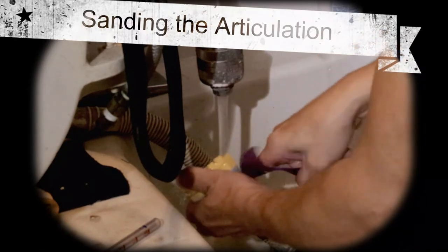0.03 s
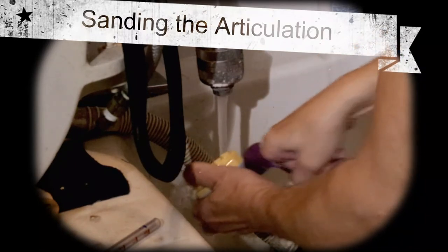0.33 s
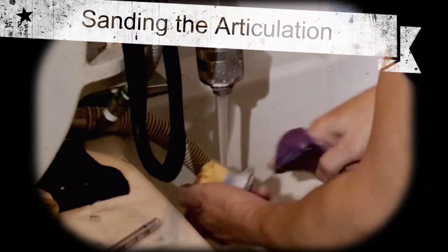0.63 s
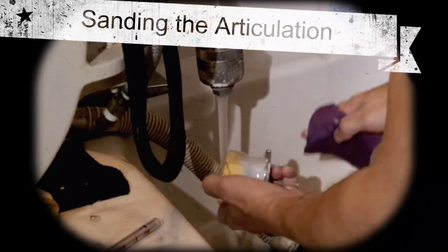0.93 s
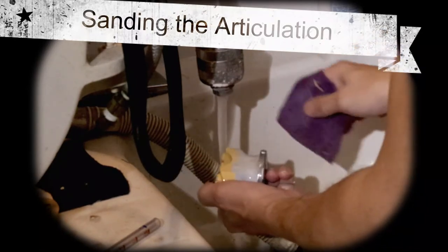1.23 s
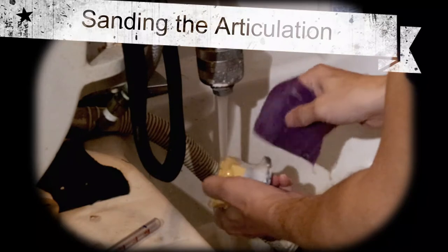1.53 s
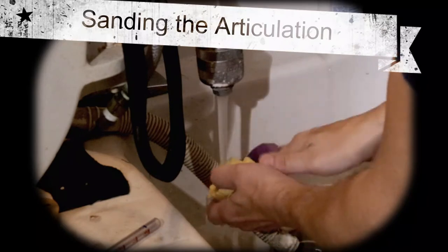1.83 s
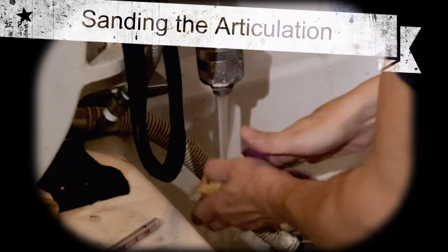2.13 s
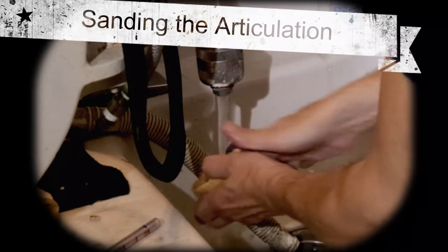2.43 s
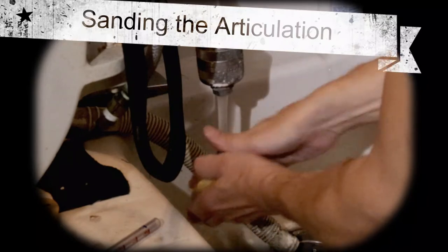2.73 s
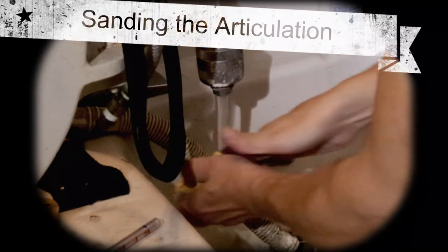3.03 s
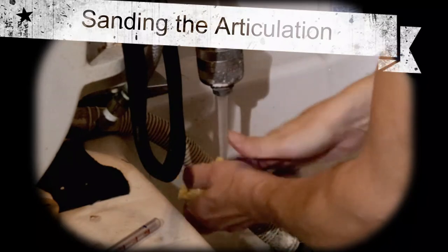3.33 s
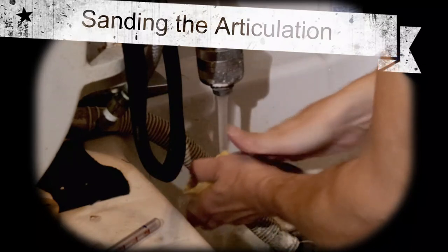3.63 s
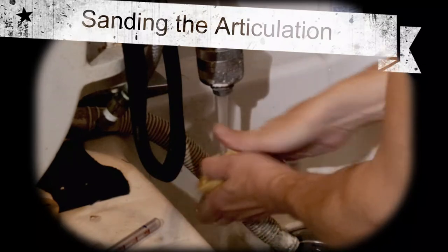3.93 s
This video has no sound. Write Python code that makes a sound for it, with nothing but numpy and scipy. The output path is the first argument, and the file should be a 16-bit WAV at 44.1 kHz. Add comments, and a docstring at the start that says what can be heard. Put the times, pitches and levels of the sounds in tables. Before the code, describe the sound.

Wet sandpaper rubs on a small hard piece in quick, hissing strokes, about eight a second. At around 0.6 seconds it stops, leaving faint paper crackles. At 1.8 seconds the paper lands with a wet slap, and the sanding continues until 4 seconds with small sharp catches. Throughout, tap water patters and bubbles softly in a tub, with a faint wavering hollow tone.

```python
"""Wet sanding under a running tap

Wet sandpaper is rubbed to and fro on a small hard piece in a tub, eight strokes a second.
The hand stops, shifts its grip on the paper, slaps it back on and sands on. Tiny hits of grit
make the hiss and ring the piece. Water patters and bubbles, and a hollow note wavers throughout.
Weak copies just before and after the sound make the whole mono scene hollow."""
import sys
import numpy as np
from scipy import signal
from scipy.fft import rfft, irfft, next_fast_len
from scipy.io import wavfile
from scipy.ndimage import map_coordinates

SR = 44100
rng = np.random.default_rng(int(sys.argv[2]) if len(sys.argv) > 2 else 0)


def wrap_up_sound(samples):
    """Save the sound to the file named by the first command line argument, as 16-bit audio."""
    columns = np.atleast_2d(samples).T
    # keep every value between -1 and 1, then stretch to whole-number steps
    tamed = np.clip(columns, -1, 1)
    steps = np.round(tamed * 32767).astype(np.int16)
    wavfile.write(sys.argv[1], SR, steps)


N = 176400


def amp(db):
    """Turn decibels into a gain to multiply by."""
    return 10 ** (np.asarray(db) / 20)


def unit(x):
    """Scale a signal to an average power of 1."""
    return x / np.sqrt(np.mean(x ** 2) + 1e-20)


def unit_spectra(gain):
    """Scale each spectrum (column) to an average power of 1."""
    return gain / np.sqrt(np.mean(gain ** 2, axis=0) + 1e-20)


def db_at(points, hz):
    """Read the level at hz from (frequency, level) points, on a log frequency axis."""
    point_hz, point_db = np.transpose(points)
    return np.interp(np.log(hz + 1), np.log(point_hz + 1), point_db)


def curve(points):
    """Join (time, value) points with straight lines, one value per sample."""
    return np.interp(np.arange(N) / SR, *np.transpose(points))


def wobble(per_s):
    """A smooth curve through per_s random values a second."""
    return map_coordinates(rng.standard_normal(4096), [np.arange(N) * per_s / SR], order=2, mode="wrap")


def bell(x, width):
    """A smooth hump of height 1 around zero."""
    return np.exp(-.5 * np.minimum((x / width) ** 2 / 2, 100))


def filtered(x, response):
    """Filter x by a gain that depends on frequency."""
    size = next_fast_len(N + SR // 4)
    return irfft(rfft(x, size) * response(np.fft.rfftfreq(size, 1 / SR)), size)[:N]


def moving_filter(x, power):
    """Filter x by a power that depends on frequency and time."""
    hz, t, spectra = signal.stft(x, SR, nperseg=256)
    return signal.istft(spectra * np.sqrt(power(hz[:, None] + 1, t)), SR, nperseg=256)[1][:N]


def noise(spectrum):
    """Steady noise shaped by (frequency, level) points."""
    return unit(filtered(rng.standard_normal(N), lambda hz: amp(db_at(spectrum, hz))))


def ringing(peaks, hz):
    """A filter response that is flat except for a lift or dip at each resonance."""
    return 1 + sum((amp(db) - 1) * 1j * hz * width / (centre ** 2 - hz ** 2 + 1j * hz * width)
                   for centre, width, db in peaks)


def impacts(per_s, spread_db, chatter_db):
    """Tiny hits of random size; chatter bunches them, as sticking and slipping does."""
    hits = (rng.random(N) < per_s / SR) * rng.choice([-1, 1], N)
    size_db = spread_db * np.minimum(rng.exponential(size=N), 5)
    return unit(hits * amp(size_db + chatter_db * wobble(per_s=420)))


def patchy(x, depth_db):
    """Add narrow resonances that come and go as water and contact shift."""
    patch_hz, patches_per_s = 119.87, 28
    spectra = signal.stft(x, SR, nperseg=768)[2]
    rows = np.linspace(0, SR / 2 / patch_hz, len(spectra))
    columns = np.linspace(0, N / SR * patches_per_s, spectra.shape[1])
    grid = np.meshgrid(rows, columns, indexing="ij")
    patches = unit(map_coordinates(rng.standard_normal((400, 400)), grid, order=1, mode="wrap"))
    return unit(signal.istft(spectra * amp(depth_db * patches), SR, nperseg=768)[1][:N])


def rumble():
    """A faint, low noise under the water."""
    # tone of the rumble (frequency [Hz], relative level [dB])
    spectrum = [(25, -22), (55, -19), (120, -5), (200, -1.5), (330, 3.5), (600, 1), (1500, -19)]
    return amp(-66) * noise(spectrum)


def hollow_note():
    """A quiet tone that wavers in pitch and flutters in level."""
    # how the note swells and fades (time [s], relative level [dB])
    swells = [(0, -63), (.42, -65), (.5, -57.5), (.65, -54), (.72, -62), (1.0, -59), (1.35, -53),
              (1.55, -52), (1.62, -63), (1.75, -58), (2.05, -56), (2.15, -67), (2.45, -64), (2.9, -57.5),
              (3.2, -58.5), (3.6, -64.5), (3.75, -51), (4, -61)]
    pitch_hz = 460.6 + 6 * wobble(per_s=70)
    flutter_db = 3.9 * wobble(per_s=45)
    tone = np.sin(2 * np.pi * np.cumsum(pitch_hz) / SR)
    return amp(curve(swells) - 2.5) * unit(tone * amp(flutter_db))


def bubbles():
    """Small bubbles ring where the stream lands, each rising in pitch as it dies away."""
    per_s, typical_hz, pitch_spread, decay_cycles = 700, 1734, 0.2933, 10.6
    when, size, a, b = rng.random((int(per_s * N / SR), 4)).T[:, :, None]
    scatter = np.sqrt(-2 * np.log(1 - a)) * np.cos(2 * np.pi * b)  # bell-curve random numbers
    hz = typical_hz * np.exp(pitch_spread * scatter)
    size_db = np.minimum(-np.log(1 - size), 4)
    samples = np.arange(SR // 50)
    cycles = hz * samples / SR
    age = cycles / decay_cycles
    rings = amp(size_db) * np.exp(-age) * np.sin(2 * np.pi * cycles * (1 + 0.046 * age))
    positions = (when * N).astype(int) + samples
    return unit(np.bincount(positions.ravel(), rings.ravel(), N)[:N])


def running_tap():
    """The jet hisses while its drops patter and bubbles ring."""
    # tone of the falling water (frequency [Hz], relative level [dB])
    spectrum = [(30, -28), (200, -18.5), (400, -8.5), (650, -6), (850, -1.5), (1200, -2), (1700, 1.5),
                (2200, 4), (2600, -4), (3300, -3.5), (4400, -0.5), (5500, -4), (7500, -7), (8800, -3),
                (11300, -4), (12200, -10.5), (15500, -20.5)]
    # hissing bands of the jet (frequency [Hz], width [Hz], lift [dB])
    jet_bands = [(4140, 340, 0), (6450, 77, 14), (6770, 110, 14), (10020, 120, 6), (11290, 145, 5)]
    # how the water swells and fades (time [s], level [dB])
    swells = [(0, -47), (.6, -41), (.8, -40), (1.3, -38.5), (1.7, -40), (1.9, -41.5), (2.1, -43.5),
              (2.6, -47.5), (2.85, -40.5), (4, -37.5)]
    drops = patchy(impacts(per_s=12000, spread_db=2.5, chatter_db=0.3), depth_db=3.5)
    spray = unit(filtered(drops, lambda hz: amp(db_at(spectrum, hz)) * ringing(jet_bands, hz)))
    level_db = curve(swells) + 0.76 * wobble(per_s=18)
    return amp(level_db) * (spray + amp(-10) * bubbles())


def scuff(at_s, envelope, centre_hz, octaves, grains):
    """One short scrape: a band of grains whose level follows envelope(time since at_s)."""
    out, half = np.zeros(N + SR), SR // 8
    middle = round(at_s * SR)
    offsets = np.arange(-half, half)
    hz = np.fft.rfftfreq(2 * half, 1 / SR) + 1
    nearby = np.take(grains, middle + offsets, mode="wrap")
    band = unit(irfft(rfft(nearby) * bell(np.log2(hz / centre_hz), octaves)))
    out[middle - half:middle + half] = band * envelope(offsets / SR)
    return out[:N]


def paper_handling():
    """The paper catches sharply as the hand moves it, and crackles in the pause."""
    # the paper catches and judders (time [s], decay [s], relative level [dB], pitch [Hz])
    catches = [(.718, 0.01, -21, 4600), (.720, .011, -26.5, 6960), (1.897, 0.019, -29, 1800),
               (2.041, 0.0097, -16, 5130), (2.104, 0.024, -23.5, 2660), (2.164, 0.037, -27, 2300),
               (2.342, .02, -16, 3400), (2.413, .015, -27, 2450), (2.594, 0.0072, -14.5, 3660),
               (2.883, 0.017, -22, 1920), (3.128, 0.02, -17, 1850), (3.15, 0.0097, -25, 4870),
               (3.161, 0.01, -23, 1750), (3.273, 0.015, -22, 2540), (3.278, .012, -29.5, 1270),
               (3.331, .014, -15.5, 4500), (3.393, 0.01, -18.5, 1860), (3.653, 0.013, -14.5, 1880),
               (3.897, 0.011, -24, 1920)]
    # wet paper rustles (time [s], width [s], relative level [dB], pitch [Hz], band width [octaves])
    rustles = [(0.541, 0.01, -28, 4000, 0.22), (0.68, .010, -33, 10000, 0.21),
               (0.699, 0.013, -35, 4500, 0.52), (0.736, 0.014, -35, 7400, 0.4),
               (0.763, 0.017, -40.5, 1560, 0.68), (1.033, 0.01, -35, 5200, 0.3),
               (1.055, .003, -33.5, 4230, 0.068), (1.208, 0.0069, -35, 9000, 0.36),
               (1.228, 0.0094, -32.5, 3550, 0.19), (1.34, 0.018, -43.5, 6150, 0.088),
               (1.443, 0.021, -37, 8600, 0.066), (1.484, .004, -31, 7750, 0.39),
               (1.759, 0.0082, -32, 1940, 0.53), (1.776, 0.0017, -21, 2300, 0.35)]
    catch_rise_s, catch_octaves = .0015, 0.12
    slips = impacts(per_s=5000, spread_db=1.5, chatter_db=4)
    crackle = patchy(impacts(per_s=1800, spread_db=0.5, chatter_db=1.5), depth_db=1.5)

    def snag(t, decay_s):
        age = np.maximum(t, 0)
        return (1 - np.exp(-age / catch_rise_s)) * np.exp(-age / decay_s)
    catching = sum(amp(db) * scuff(at_s, lambda t: snag(t, decay_s), hz, catch_octaves, slips)
                   for at_s, decay_s, db, hz in catches)
    rustling = sum(amp(db) * scuff(at_s, lambda t: bell(t, width_s), hz, octaves, crackle)
                   for at_s, width_s, db, hz, octaves in rustles)
    return catching + rustling


def slap():
    """The wet paper lands on the piece and water splashes after it."""
    # tone of the slap and splash (frequency [Hz], relative level [dB])
    spectrum = [(200, -55), (450, -33), (620, -26.5), (800, -13.5), (1150, -7.5), (1500, -5), (2100, -0.5),
                (2800, -12.5), (3700, -1.5), (5200, -8.5), (6700, -23), (8500, -17.5), (11000, -33),
                (15000, -54)]
    lands_s, rise_s, smack_decay_s, splash_decay_s = 1.7935, 0.007, 0.0073, 0.076
    t = np.arange(N) / SR - lands_s
    rise, age = np.exp(np.minimum(t, 0) / rise_s), np.maximum(t, 0)
    smack = amp(-9) * np.exp(-age / smack_decay_s)
    splash = amp(-27.5) * np.exp(-age / splash_decay_s)
    return rise * (smack + splash) * noise(spectrum)


def sanding():
    """Each stroke hisses with its speed, rasps where the fingers press hardest and rings the piece."""
    # strokes of the paper, with relative levels (start [s], length [s], hiss [dB],
    # brightness [dB/octave], lower edge [Hz], ring [dB], point of hardest press [0-1],
    # rasp [dB], rasp pitch [Hz])
    strokes = [ (-.035, 0.12, -26.5, 2, 2600, -28, 0.6, -22.5, 3740),
               (0.089, 0.11, -25.5, 7.5, 2600, -28, 0.3, -22.5, 3900),
               (0.204, 0.12, -26, -0.5, 2680, -30.5, 0.68, -19.5, 3980),
               (0.331, 0.11, -24, 3, 2600, -28, 0.75, -24, 3370),
               (0.442, 0.11, -25, 3, 2660, -35.5, 0.25, -23.5, 3200),
               (1.902, 0.11, -21.5, -1, 3900, -43, .35, -27, 5100),
               (2.027, 0.11, -19, -2, 3580, -46, 0.3, -32, 4900),
               (2.166, 0.092, -20.5, 4.5, 3700, -42, 0.16, -23.5, 4170),
               (2.283, 0.089, -22, -1.5, 3650, -60, 0.86, -22.5, 3240),
               (2.413, 0.099, -26, -1, 3560, -44, 0.14, -28, 4070),
               (2.53, 0.092, -22, -5, 4260, -40.5, 0.72, -19.5, 4070),
               (2.639, 0.11, -24, -3, 3700, -36.5, 0.19, -27, 4360),
               (2.76, 0.12, -25.5, -6.5, 3460, -30.5, 0.6, -18, 4200),
               (2.888, .097, -23, -3.5, 3570, -33, 0.3, -41, 4400),
               (3.003, 0.12, -25.5, -4, 3540, -32.5, 0.6, -17.5, 3970),
               (3.144, 0.11, -24.5, 5, 3400, -29, 0.12, -26, 4270),
               (3.265, 0.11, -25.5, -3.5, 3160, -26, 0.69, -19.5, 4750),
               (3.403, 0.1, -24.5, -1, 3240, -31, 0.4, -28, 4500),
               (3.529, 0.11, -24, -4.5, 3140, -25, 0.6, -17, 4430),
               (3.646, 0.12, -26, -4, 3430, -28.5, .55, -42, 4600),
               (3.775, 0.11, -27, -5, 3300, -26, 0.61, -19, 4870),
               (3.902, 0.12, -30, 6, 3300, -29.5, 0.16, -33.5, 4500)]
    # tone of the rubbing grit (frequency [Hz], relative level [dB])
    hiss_spectrum = [(1000, 8), (3000, -5.5), (5500, 3), (7000, 0.5), (9000, -1), (10500, -14),
                     (13000, -23.5), (16000, -34)]
    # tone of the ringing piece (frequency [Hz], relative level [dB])
    piece_spectrum = [(300, -49), (600, -24), (1000, -13), (1400, -16.5), (1850, 1.5), (2200, -0.5),
                      (2700, -2.5), (4000, -4.5), (9000, -41)]
    edge_db_per_octave, dulling_db_per_octave = 32, 15.5
    press_s, rasp_octaves, glide_octaves_per_s = 0.012, 0.25, -11  # the rasp sinks as fingers close in
    skew = 0.89  # below 1 the hand speeds up faster than it slows

    def power(hz, t):
        total = np.zeros((len(hz), len(t)))
        piece = unit_spectra(amp(db_at(piece_spectrum, hz)))
        for start, length, hiss_db, brightness, edge_hz, ring_db, press_at, rasp_db, rasp_hz in strokes:
            active = (t > start - .02) & (t < start + length + .02)
            progress = np.clip((t[active] - start) / length, 0, 1)
            speed = np.maximum(np.sin(np.pi * progress ** skew), 1e-6) ** 0.39
            octaves = np.log2(hz / edge_hz)
            tilt_db = (brightness - dulling_db_per_octave * (1 - speed)) * octaves  # slow is duller
            low_cut_db = edge_db_per_octave * np.minimum(octaves, 0)
            hiss = unit_spectra(amp(db_at(hiss_spectrum, hz) + tilt_db + low_cut_db))
            rubbing = speed ** 2 * ((amp(hiss_db) * hiss) ** 2 + (amp(ring_db) * piece) ** 2)

            since_press = t[active] - start - press_at * length
            press = amp(rasp_db) * bell(since_press, press_s)
            glide = glide_octaves_per_s * since_press
            rasp = unit_spectra(bell(np.log2(hz / rasp_hz) - glide, rasp_octaves))
            pressing = press ** 2 * (rasp ** 2 + (amp(-12) * piece) ** 2)
            ease = amp(-5.5 * progress ** 5)  # the fingers let up towards the end of a stroke
            total[:, active] += ease ** 2 * (rubbing + pressing)
        return total
    grit = patchy(impacts(per_s=17000, spread_db=3, chatter_db=0.77), depth_db=3)
    return moving_filter(grit, power)


def tub_echo(x):
    """The tub rings briefly after each sound made by the hands."""
    fade_s = 0.34  # time to fall by 60 dB
    t = np.arange(SR // 3) / SR
    tail = rng.standard_normal(len(t)) * amp(-60 * t / fade_s)
    return amp(-17.5) * signal.fftconvolve(x, tail / np.linalg.norm(tail))[:N]


def scene():
    """Mix the working hands and their echo with the water, the note and the rumble."""
    # resonances around the hands and piece (frequency [Hz], width [Hz], lift [dB])
    hollows = [(1455, 76, 6.5), (1840, 68, 4.5), (2163, 112, 4.5), (2800, 68, 2), (3150, 40, -3),
               (3390, 13, -8.5), (3570, 40, 1.5), (4040, 24, 8), (4300, 41, 3), (4170, 120, 1.5),
               (4640, 65, 2.5), (4990, 85, 3.5), (5500, 180, 1.5)]
    hands = amp(-1.5) * filtered(sanding() + paper_handling() + slap(), lambda hz: ringing(hollows, hz))
    return (hands + tub_echo(hands) + running_tap() + hollow_note() + rumble())[None]


def record(dry):
    """Add a weak early and late copy for a hollow tone, cut the top treble, make two equal channels."""
    gap_s, early, late, top_hz = .017415, 0.24, 0.11, 15830

    def doubling(hz):
        shift = np.exp(2j * np.pi * hz * gap_s)
        return (1 + early * shift + late / shift) / np.sqrt(1 + early ** 2 + late ** 2)
    mono = filtered(dry[0], lambda hz: doubling(hz) * (hz < top_hz))
    return np.tile(mono, (2, 1))


dry = scene()
out = record(dry)
wrap_up_sound(out)
```